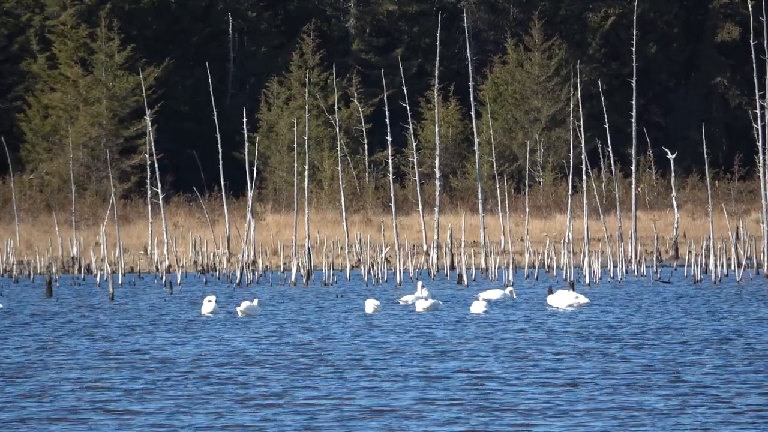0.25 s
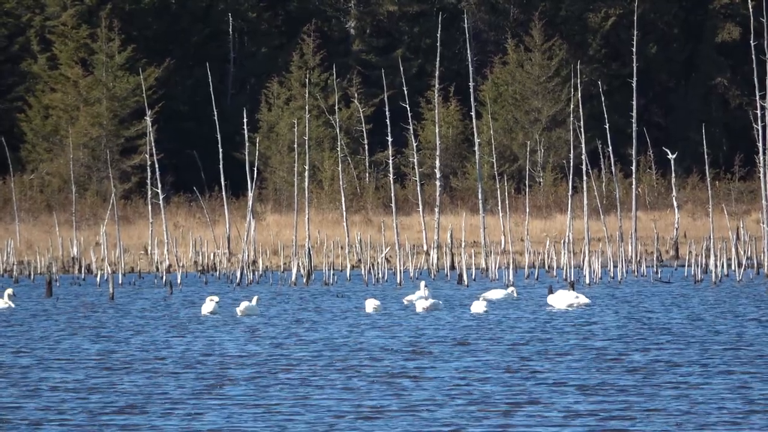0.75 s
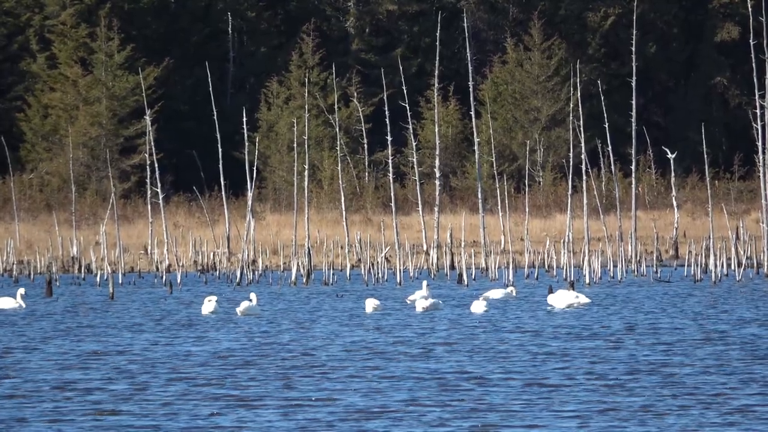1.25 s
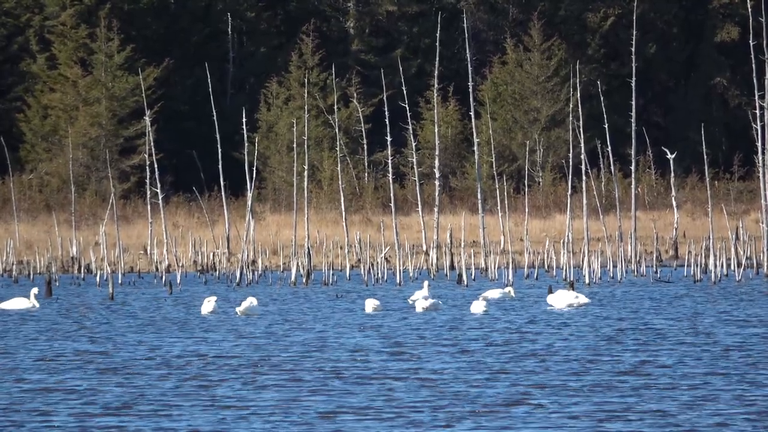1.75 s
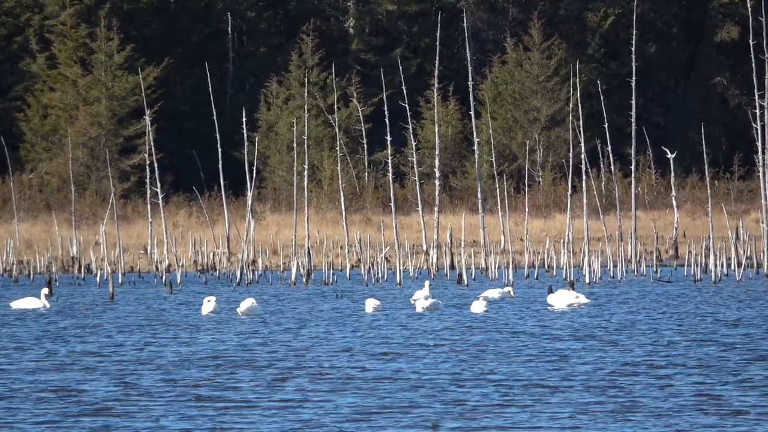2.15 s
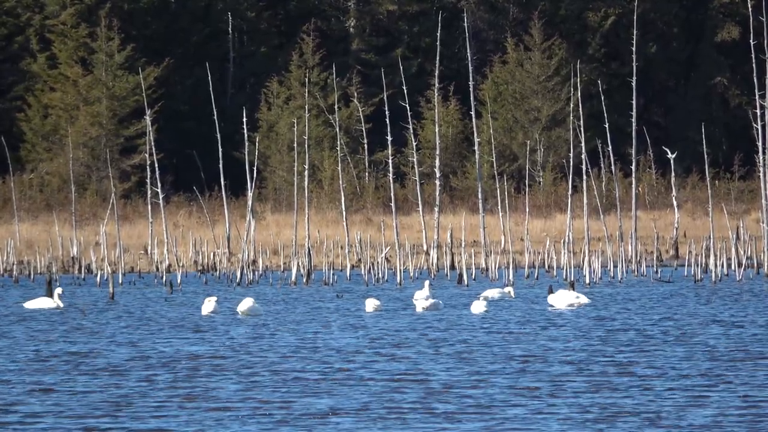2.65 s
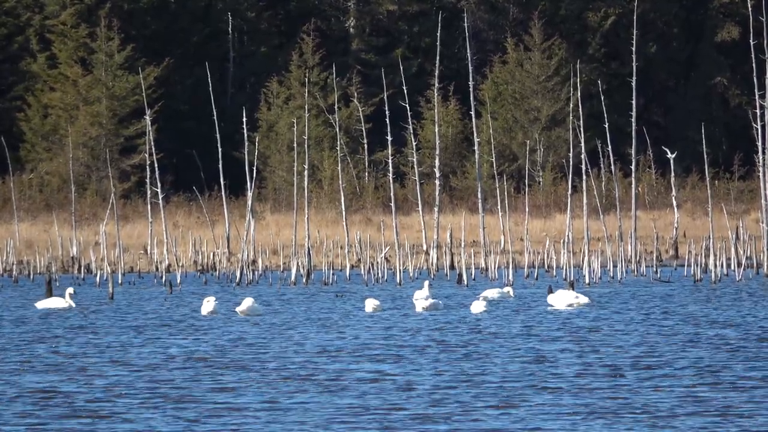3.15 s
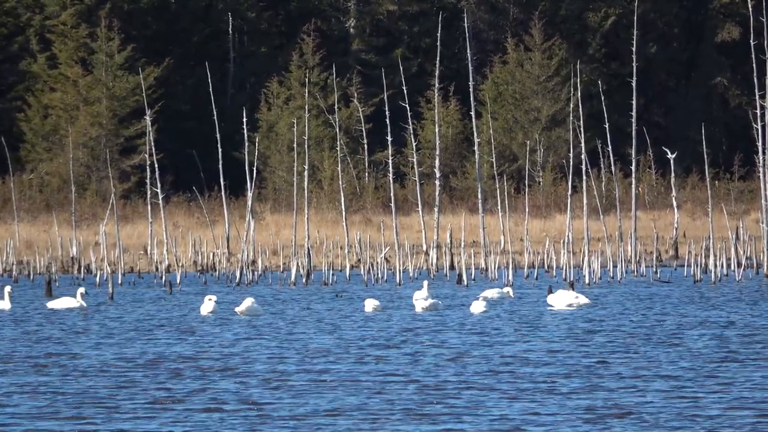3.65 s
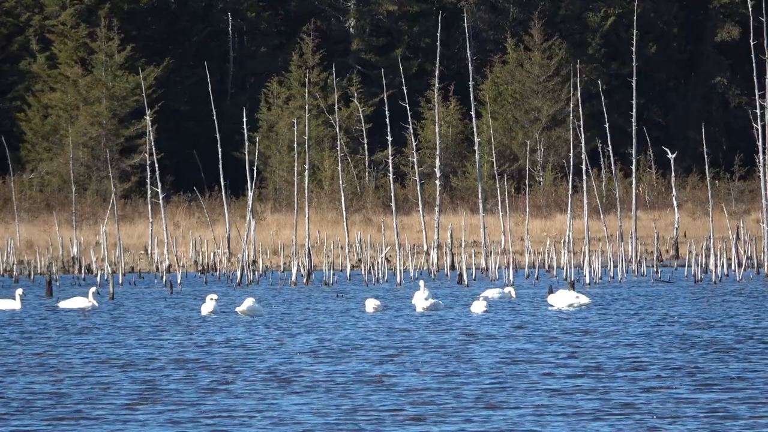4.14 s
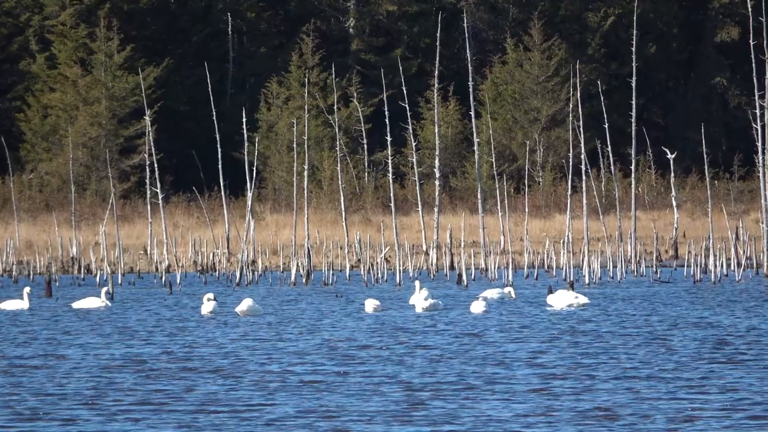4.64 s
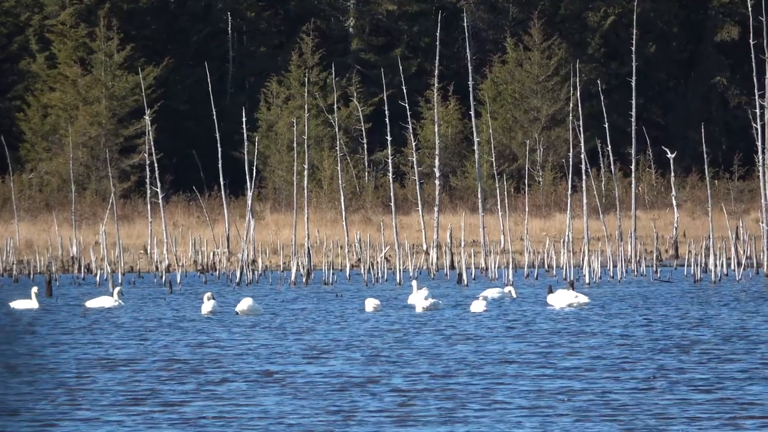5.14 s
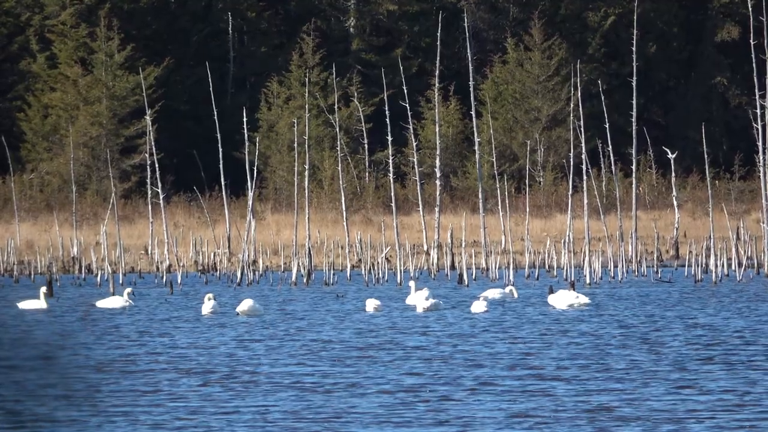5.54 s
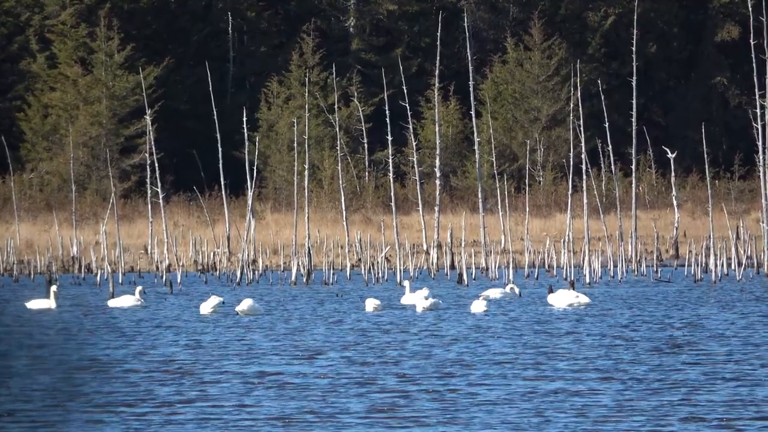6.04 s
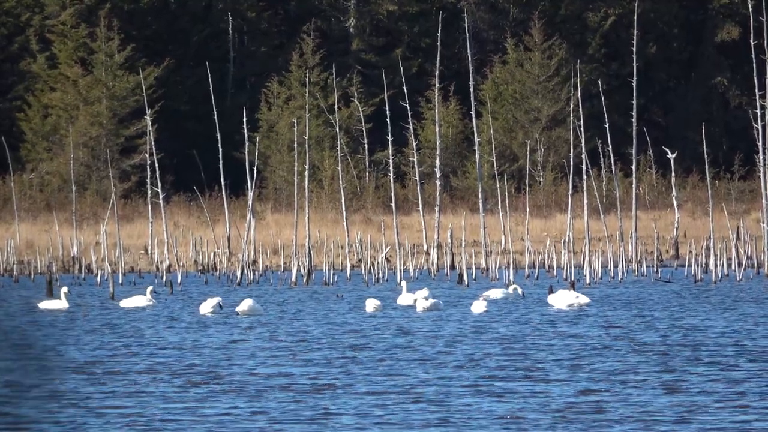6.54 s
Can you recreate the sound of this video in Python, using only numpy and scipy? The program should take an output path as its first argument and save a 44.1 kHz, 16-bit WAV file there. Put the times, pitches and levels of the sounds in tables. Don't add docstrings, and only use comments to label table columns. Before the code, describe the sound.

A distant flock of swans honks in short overlapping calls across a lake while strong wind rumbles and buffets the bare microphone.

```python
import sys
import numpy as np
from scipy import signal
from scipy.fft import rfft, irfft, next_fast_len
from scipy.io import wavfile
from scipy.ndimage import uniform_filter1d

SR = 44100
rng = np.random.default_rng(int(sys.argv[2]) if len(sys.argv) > 2 else 0)


def dump_mix(stems):
    frames = np.atleast_2d(stems).T
    limited = np.clip(frames, -1, 1)
    pcm = np.round(limited * 32767).astype(np.int16)
    wavfile.write(sys.argv[1], SR, pcm)


def volts_from_db(level):
    exponent = np.asarray(level, float) / 20
    return 10 ** exponent


N = 299439

# pitch_hz, level_db (per Hz)
WATER_COLOUR = [(150, -20), (250, 4), (335, -1), (693, -3.5), (1180, -9.5), (2360, -22), (3460, -23),
                (4260, -20), (5520, -28), (7930, -23), (12900, -31.5), (15600, -34)]
# start_s, jump_db, rattle_db
SPRING_FREE = (6.6924, -4, -38)


def size_of(seconds):
    return max(round(seconds * SR), 1)


def evened(x):
    return x / np.sqrt(np.mean(x ** 2) + 1e-20)


def read(points, hz):
    f, value = np.transpose(points)
    return np.interp(np.log(hz + 1), np.log(f + 1), value)


def curves(rows, t):
    s, *columns = np.transpose(rows)
    return [np.interp(t, s, c) for c in columns]


def add(mix, s, sound):
    part = mix[round(s * SR):][:len(sound)]
    part += sound[:len(part)]


def drift(size, span):
    once = uniform_filter1d(rng.standard_normal(size), span)
    return evened(uniform_filter1d(once, span))


def resonate(x, hz, width_hz):
    turn = np.exp(2j * np.pi * hz * np.arange(len(x)) / SR)
    r = np.exp(-np.pi * width_hz / SR)
    once = signal.lfilter([1 - r], [1, -r], x / turn)
    twice = signal.lfilter([1 - r], [1, -r], once)
    return 2 * (turn * twice).real


def band(tone, lo_hz, hi_hz, order=2):
    size = next_fast_len(N)
    hz = np.fft.rfftfreq(size, 1 / SR) + 1e-6
    low_edge = 1 + (lo_hz / hz) ** (2 * order)
    high_edge = 1 + (hz / hi_hz) ** (2 * order)
    spectrum = rfft(rng.standard_normal(size)) * volts_from_db(read(tone, hz)) / np.sqrt(low_edge * high_edge)
    return evened(irfft(spectrum, size)[:N])


def steady(x, seconds, slack):
    return evened(x / np.sqrt(uniform_filter1d(x ** 2, size_of(seconds)) + slack))


def clicks(events, noise, t60_s):
    out, t = np.zeros(N), np.arange(size_of(.03)) / SR
    shape = volts_from_db(-60 * t / t60_s) * np.minimum(t / .0008, 1)
    for s, db in events:
        burst = noise[round(s * SR):][:len(t)] * shape
        add(out, s, volts_from_db(db) * burst / np.linalg.norm(burst) * np.linalg.norm(shape))
    return out


def hump(u, rise, fall, top, curve):
    top = np.clip(top, .1, .9)
    before = rise * abs(1 - u / top) ** curve
    after = fall * abs((u - top) / (1 - top)) ** curve
    return np.where(u < top, before, after)


def honk(rows, voice_db):
    t = np.arange(rows[0][0] - .01, rows[-1][0] + 0.012, 1 / SR)
    hz, db = curves(rows, t)
    longest = size_of(.3)
    wobble = 1 + .005 * drift(longest, size_of(.004))[:len(t)]
    turns = np.cumsum(hz * wobble) / SR + rng.random()
    shares = volts_from_db(np.array([0, *voice_db]))
    note = np.zeros(len(t))
    for k, share in enumerate(shares / np.linalg.norm(shares), 1):
        flicker_db = 1.2 * drift(longest, size_of(.007))[:len(t)]
        note += share * volts_from_db(flicker_db) * np.cos(2 * np.pi * k * turns)
    fades = signal.windows.tukey(len(t), min(0.036 * SR / len(t), 1))
    return t[0], np.sqrt(2) * volts_from_db(db) * note * fades


def shaped(start, length, pitch_hz, level_db, second_db, bend, way):
    third_db, lift, onset_db, ending_db, peak = way
    u = np.linspace(0, 1, 24)
    hz = pitch_hz * (1 - hump(u, *bend, 1.95))
    db = level_db + hump(u, onset_db, ending_db, peak, 2.4)
    fade_db = -34 * max(3 * pitch_hz - 1720, 0) / 1000
    return np.transpose([start + length * u, hz, db]), (second_db, third_db + lift * second_db + fade_db)


def honks():
    # start_s, length_s, pitch_hz, level_db, second_db (second partial over the first)
    low_rising = [
        (1.545, 0.055, 495, -46.5, -16),
        (2.01, 0.072, 464, -50.5, -3),
        (2.425, 0.079, 463, -46, 0),
        (2.87, 0.02, 465, -43.5, -4),
        (3.466, 0.029, 470, -40, -7),
        (3.56, 0.046, 503, -35, 2.5),
        (3.982, 0.0132, 475, -39.5, -12),
        (4.058, 0.031, 497, -41, 2),
        (4.408, 0.056, 488, -39, 0.5),
        (4.83, 0.081, 533, -40, 5),
    ]
    low_falling = [
        (.29, 0.088, 451, -48.5, -7),
        (2.12, 0.068, 440, -48.5, -7),
        (2.503, 0.07, 467, -41.5, -3),
    ]
    low_reedy = [
        (1.078, 0.037, 467, -45, -11),
        (2.66, 0.026, 482, -41.5, -5),
        (2.722, 0.041, 488, -42, 6),
        (3.318, 0.03, 476, -43, 3),
        (5.655, 0.049, 465, -43.5, -5),
    ]
    middle = [
        (.836, 0.03, 610, -49, 13),
        (1.752, 0.061, 565, -38.5, 10.5),
        (2.38, 0.062, 580, -46.5, 22),
        (2.948, 0.039, 621, -43.5, 6),
        (3.39, 0.065, 571, -34, 36),
        (4.478, 0.03, 580, -40.5, 25),
        (4.91, 0.061, 566, -45, 6),
        (5.303, 0.064, 601, -44, 10),
        (5.44, 0.051, 595, -52, 18),
        (5.782, 0.036, 577, -43, 5),
    ]
    high_arched = [
        (.405, 0.086, 742, -39.5, -5.5),
        (.86, 0.097, 796, -49.5, 2),
        (1.588, 0.082, 750, -41, 4),
        (2.676, 0.084, 744, -38, 3.5),
        (3.37, 0.033, 733, -41, -6),
        (3.779, 0.076, 734.4, -36.5, -1.5),
        (4.012, 0.087, 800, -48, -29),
        (4.262, 0.048, 727, -41.5, -15),
        (4.918, 0.042, 755, -38, -3),
    ]
    high_falling = [
        (2.412, 0.04, 751, -39.5, -11),
        (3.584, 0.086, 825, -41, -11),
        (4.082, 0.046, 659, -39, -6.5),
        (4.486, 0.071, 678, -37, 0.5),
        (4.596, 0.0626, 780, -40.5, -11),
        (4.912, 0.048, 671, -38.5, -3.5),
        (5.256, 0.059, 745, -41, 0),
    ]
    # third_db, share of the second partial's lift it takes, onset_db, ending_db, peak place (share of the
    low_rising_way = (-13.5, -0.1, -2.5, -24, 3.3)
    low_falling_way = (-30, -4, -16, -9, 0)
    low_reedy_way = (-2, .2, -10, -11, .45)
    middle_way = (-11, 0.45, -4, -10, 1.1)
    high_arched_way = (-8, 1.2, -5, -10.5, 0.7)
    high_falling_way = (-19, 1.5, -8, -2.5, -0.5)
    # time_s, pitch_hz, level_db
    long_call = [
        (6.56, 455.6, -43),
        (6.6, 463, -43),
        (6.67, 471, -41.5),
        (6.7, 473.5, -49),
        (6.79, 479, -38.5),
    ]
    kinds = [(low_rising, (.065, .005, .85), low_rising_way),
             (low_falling, (.01, .09, .2), low_falling_way),
             (low_reedy, (.012, .01, .5), low_reedy_way),
             (middle, (.035, .03, .6), middle_way),
             (high_arched, (.062, .065, .62), high_arched_way),
             (high_falling, (.025, .095, .3), high_falling_way)]
    out = np.zeros(N)
    for calls, bend, way in kinds:
        for row in calls:
            add(out, *honk(*shaped(*row, bend, way)))
    add(out, *honk(long_call, (6, 4.5)))
    return out


def pulses(hz, rough):
    # pitch_hz, width_hz, level_db
    windpipe = [(740, 180, 3.5), (1117, 340, 4.5), (1340, 110, -4)]
    turns = np.cumsum(hz * (1 + 0.134 * rough * drift(len(hz), size_of(0.0032)))) / SR
    folds = sum(np.cos(2 * np.pi * k * turns) for k in range(2, 10))
    puffs = (0.15 + np.exp(-(turns % 1) / 0.65)) * rng.standard_normal(len(hz))
    drive = (1 - rough) * evened(folds) + rough * 2.5 * evened(puffs)
    pipe = sum(volts_from_db(g) * resonate(drive, f, w) for f, w, g in windpipe)
    return evened(signal.sosfilt(signal.butter(6, 1520, fs=SR, output="sos"), pipe))


def grunt(s, length, rate_hz, db, rough, glide_per_s):
    size, longest = size_of(length + .015), size_of(.2)
    hz = rate_hz * (1 + glide_per_s * (np.arange(longest) - size / 2) / SR)
    return s - .008, volts_from_db(db + 6.0) * pulses(hz, rough)[:size] * np.hanning(size)


def purr():
    # time_s, pulse_rate_hz, level_db
    purr_path = [
        (3.19, 160, -53),
        (3.24, 162, -50),
        (3.29, 167, -48),
        (3.33, 177, -45),
        (3.36, 183, -48),
    ]
    t = np.arange(purr_path[0][0], purr_path[-1][0], 1 / SR)
    hz, db = curves(purr_path, t)
    ringing = evened(resonate(pulses(hz, .01), 1420, 450))
    return t[0], volts_from_db(db) * ringing * signal.windows.tukey(len(t), .2)


def grunts():
    # start_s, length_s, pulse_rate_hz, level_db, roughness (0-1)
    climbing = [(1.565, 0.049, 202, -54, 0.68), (1.721, 0.054, 182, -47.5, 0.42),
                (1.798, 0.037, 183, -56, 0.3), (2.867, 0.048, 201.5, -54, 0.7),
                (2.929, 0.047, 202.3, -49, 0.7), (3.355, 0.031, 176, -46, 0.48),
                (3.448, 0.052, 186, -64, 0.8), (3.575, 0.078, 196, -51, 0.52),
                (3.975, 0.14, 193.2, -51, 0.45), (5.222, 0.029, 181.2, -50.5, 0.37),
                (5.64, 0.027, 189.7, -51, 0.46)]
    sinking = [
        (0.388, 0.029, 204, -49, 0.8),
        (2.648, 0.035, 204, -45, 0.48),
        (4.375, 0.04, 186, -45.5, 0.35),
        (4.438, 0.05, 186.5, -50, 0.5),
        (4.803, 0.085, 178.7, -45.5, 0.35),
    ]
    out = np.zeros(N)
    for row in climbing:
        add(out, *grunt(*row, 0.696))
    for row in sinking:
        add(out, *grunt(*row, -1.94))
    add(out, *purr())
    return out


def shore(x):
    # pitch_hz, t60_s
    shore_ring = [(400, .5), (1500, .6), (3000, .3)]
    hz, t, z = signal.stft(rng.standard_normal(SR), SR, nperseg=512)
    decay = volts_from_db(-60 * t / read(shore_ring, hz)[:, None])
    tail = signal.istft(z * decay * np.minimum(t / 0.048, 1), SR, nperseg=512)[1]
    return signal.fftconvolve(x, tail / np.linalg.norm(tail))[:N]


def swans():
    flock = honks() + grunts()
    return flock + volts_from_db(-20.0) * shore(flock)


def strays():
    # start_s, length_s, from_hz,
    # to_hz, level_db
    lone_partials = [(0.563, 0.041, 1472, 1450, -52), (.66, 0.043, 1486, 1500, -61), (1.065, .02, 670, 690, -48),
                     (1.81, 0.038, 1310, 1110, -48), (2.487, 0.027, 1257, 1070, -44),
                     (2.801, .035, 1430, 1400, -51), (2.852, .022, 1464, 1480, -56),
                     (2.901, 0.069, 462, 470, -50), (3.462, 0.014, 1600, 1480, -48), (3.603, .04, 726, 610, -44),
                     (3.728, 0.038, 730, 750, -41), (2.356, 0.031, 1095, 1160, -39),
                     (2.35, 0.04, 1640, 1740, -55), (3.896, 0.023, 1417, 1450, -58),
                     (3.956, 0.018, 1457, 1400, -51), (3.988, 0.028, 995, 1196, -43),
                     (4.024, .04, 1120, 1070, -51), (4.406, 0.035, 1350, 1400, -51),
                     (4.677, 0.032, 1570, 1460, -52), (4.765, 0.046, 1000, 1400, -63),
                     (4.831, 0.048, 1550, 1580, -48), (4.91, 0.091, 1580, 1680, -52),
                     (4.993, 0.02, 756, 650, -51), (5.0, 0.051, 1340, 1340, -52.5),
                     (5.782, .018, 1380, 1350, -46), (6.513, .03, 1170, 1220, -54),
                     (5.234, 0.028, 1590, 1300, -43), (5.381, 0.02, 814, 690, -41), (.5, 0.033, 1446, 1510, -49),
                     (3.367, 0.031, 1210, 1280, -42), (3.37, .03, 830, 910, -43), (4.799, 0.055, 1340, 1234, -43),
                     (4.837, .025, 555, 440, -38.5), (3.55, 0.056, 1250, 1187, -43.5),
                     (3.585, .012, 1376, 1380, -46),
                     (.69, 0.039, 1484, 1460, -60), (1.578, .02, 1278, 1240, -39.5),
                   (1.814, 0.033, 1254, 1180, -54), (2.655, 0.026, 1290, 1200, -41),
                   (3.55, 0.045, 673, 660, -45), (3.77, 0.018, 1255, 1170, -45),
                   (3.81, 0.068, 1260, 1220, -50), (3.997, 0.027, 690, 760, -44),
                   (4.098, 0.065, 1283, 1252, -51), (4.37, 0.025, 795, 720, -46),
                   (4.392, .035, 1150, 1050, -45), (4.449, .035, 1148, 1025, -41),
                   (4.82, 0.1, 1155, 1240, -46), (4.927, 0.04, 1326, 1190, -48),
                   (5.224, .03, 1064, 1114, -42)]
    out = np.zeros(N)
    for s, length, from_hz, to_hz, db in lone_partials:
        rows = [(s, from_hz, db - 10),
                (s + length / 2, (from_hz + to_hz) / 2, db),
                (s + length, to_hz, db - 10)]
        add(out, *honk(rows, ()))
    return out


def reeds(x):
    t60_s = .16
    t = np.arange(size_of(t60_s)) / SR
    tail = rng.standard_normal(len(t)) * volts_from_db(-60 * t / t60_s) * np.minimum(t / .006, 1)
    return x + volts_from_db(-12) * signal.fftconvolve(x, tail / np.linalg.norm(tail))[:N]


def murmur(t, count=1300):
    # time_s, level_db
    murmur_level = [(0, -63), (.6, -59), (1.3, -58.5), (1.7, -53), (2.1, -57), (2.6, -51.5), (3.1, -60),
                    (3.5, -56), (3.72, -45.5), (3.9, -54), (4.15, -59), (4.45, -49), (4.85, -58),
                    (5.05, -57), (5.3, -54), (5.7, -54.5), (6.1, -62), (6.5, -55), (6.79, -55)]
    lo_hz, hi_hz, note_s = 700, 1490, .04
    out, u = np.zeros(N), np.linspace(-1, 1, size_of(note_s))
    for when, pitch, bend, size in rng.random((count, 4)):
        glide = 1 + .08 * ((2 * bend - 1) * u - .5 * u ** 2)
        hz = (lo_hz + pitch * (hi_hz - lo_hz)) * glide
        note = np.hanning(len(u)) * np.sin(2 * np.pi * np.cumsum(hz) / SR)
        add(out, when * t[-1], volts_from_db(4.5 * size) * note)
    return volts_from_db(curves(murmur_level, t)[0]) * evened(out)


def wind(t):
    # time_s, level_db
    wind_strength = [(0, -8), (.2, -13), (.4, -8.5), (.9, -9.5), (1.2, -12.5), (1.6, -13.5), (2.15, -18.5),
                     (2.9, -12), (3.3, -15.5), (3.75, -8.5), (4.0, -14), (4.5, -11), (5.2, -11), (5.45, -6),
                     (5.9, -14), (6.1, -7.5), (6.5, -8.5), (6.79, -1)]
    # pitch_hz, level_db (per Hz)
    wind_colour = [(2.4, -81), (4.0, 4.5), (16, 6.5), (30, 5), (41, -9.5), (178, -31), (400, -49),
                   (520, -53), (880, -120)]
    # middle_s, length_s, flutter_lift_db, edge_lift_db
    eddies = [(0.484, 0.57, 1, 2.5), (0.723, 0.47, 4.5, 3.5), (0.927, 0.13, 10, 3.5), (1.2, 0.23, 5, 5.5),
              (1.711, 0.086, 16, 6), (2.072, 0.16, 3.5, 3), (2.54, 0.18, 3.5, -2.5), (2.94, 0.16, 1, -2),
              (3.212, 0.11, 9.5, 0), (3.68, 0.17, 5, -1.5), (4.082, 0.23, 9.5, 3), (4.526, 0.32, 3.5, 3.5),
              (5.197, 0.15, 6, -2), (5.404, 0.16, 6.5, 18), (5.554, 0.15, 2.5, 3.5),
              (5.647, 0.27, 7.5, 9.5), (5.835, 0.13, 9.5, -7), (6.098, 0.13, 9, 18),
              (6.171, 0.14, 11, 14.5), (6.376, 0.055, 7, 14), (6.53, 0.12, 6, -3), (6.648, 0.18, 10, 12)]
    deep_db, = curves(wind_strength, t)
    lifts_db = np.zeros((N, 2))
    for s, length, *lift_db in eddies:
        swell = signal.windows.tukey(size_of(length), 0.91)
        add(lifts_db, s - length / 2, np.outer(swell, lift_db))
    over_mean_db = deep_db + 13
    flutter_db = -28.5 + 0.79 * over_mean_db + lifts_db[:, 0] + 2.0 * drift(N, size_of(0.0108))
    edge_db = -44 + 0.58 * over_mean_db + lifts_db[:, 1] + 1.33 * drift(N, size_of(0.0032))
    deep = volts_from_db(deep_db) * steady(band(wind_colour, 1.3, 61.6, order=4), 0.12, 0.2)
    flutter = volts_from_db(flutter_db) * steady(band(wind_colour, 43.7, 109.3, order=4), 0.056, 0.98)
    edge = volts_from_db(edge_db) * steady(band(wind_colour, 105.3, 414, order=4), 0.049, 0.16)
    under_way = np.clip(t / .012, 0, 1)
    push = (deep + flutter) * under_way + volts_from_db(-3.5) * (1 - under_way)
    return push / (1 + push ** 8) ** (1 / 8), edge


def pinned():
    # start_s, length_s, level_db (change)
    deaf_spells = [
        (5.389, 0.0021, -18),
        (5.426, 0.0065, -34),
        (5.586, 0.002, -20),
        (6.118, 0.0032, -25),
        (6.265, 0.0048, -11),
        (6.371, 0.0065, -32),
        (6.375, 0.028, -3.5),
        (6.672, 0.03, -38),
        (6.747, 0.0061, -17),
    ]
    deaf_db = np.zeros(N)
    for s, length, db in deaf_spells:
        add(deaf_db, s, np.full(size_of(length), 1. * db))
    return deaf_db


def snap():
    s, jump_db, rattle_db = SPRING_FREE
    out = clicks([(s, rattle_db)], band(WATER_COLOUR, 2500, 9000), .015)
    u = np.arange(size_of(.08)) / SR
    jump = np.sin(np.pi / 2 * np.minimum(u / .0014, 1)) * np.exp(-u / .009)
    add(out, s, volts_from_db(jump_db) * jump)
    return out


def creaks():
    # start_s, length_s, slips_hz, level_db (peak)
    slipping = [(5.1, .005, 640, -37), (5.14, .0065, 780, -34), (5.167, .005, 650, -41),
                (5.372, .007, 800, -38), (5.508, .006, 850, -38), (5.553, .007, 520, -37),
                (5.601, .006, 500, -37), (5.656, .006, 550, -37), (6.056, .005, 600, -41),
                (6.2345, .0075, 1280, -36), (6.2345, .007, 1950, -36), (6.3015, .006, 430, -35),
                (6.3515, .005, 540, -38), (6.4635, .007, 360, -33), (6.59, .007, 600, -37)]
    out = np.zeros(N)
    for s, length, rate_hz, db in slipping:
        size = size_of(length)
        turns = np.cumsum(rate_hz * (1 + .12 * drift(size, size_of(.0008)))) / SR
        slips = sum(np.sin(2 * np.pi * k * turns) / k for k in range(1, 5))
        add(out, s, volts_from_db(db - 3.5) * slips * signal.windows.tukey(size, .25))
    return signal.sosfilt(signal.butter(4, 1700, fs=SR, output="sos"), out)


def water(t):
    # time_s, near_ripples_db, far_wash_db
    water_level = [(0.0, -55, -45.5), (1.64, -58, -46), (2.7, -56, -45.5), (3.2, -57.5, -45),
                   (3.5, -55.5, -41.5), (4.01, -56.5, -46.5), (4.63, -53.5, -45), (4.8, -52.5, -44.5),
                   (5.12, -56, -46.5), (5.6, -53.5, -45), (6.0, -56, -47), (6.47, -55, -46.5),
                   (6.79, -57.5, -42.5)]
    near_db, far_db = curves(water_level, t)
    flicker_db = 1.1 * drift(N, size_of(.022)) + 1.1 * drift(N, size_of(.003))
    swell = drift(N, size_of(0.12))
    far = volts_from_db(far_db + 2.05 * swell - 2.5) * band(WATER_COLOUR, 320, 2310, order=4)
    near = volts_from_db(near_db + flicker_db + 0.27 * swell - 0.13) * band(WATER_COLOUR, 2010, 23000, order=4)
    return far + near


def droplets():
    # start_s, level_db (peak)
    drops = [(1.1992, -33), (2.3526, -50), (2.7537, -32), (2.9737, -53), (3.4152, -47), (3.5304, -50),
             (.8006, -54), (2.624, -54), (6.478, -43), (4.0123, -30), (4.389, -44), (4.4244, -44),
             (5.6304, -27), (6.404, -30)]
    return clicks(drops, band(WATER_COLOUR, 4000, 15900), 0.0026)


def scene():
    t = np.arange(N) / SR
    air = reeds(swans() + strays()) + murmur(t) + water(t) + droplets()
    rumble, edge = wind(t)
    deaf_db = pinned()
    heard = air * volts_from_db(uniform_filter1d(deaf_db, size_of(0.00079)))
    heard += edge * uniform_filter1d(volts_from_db(deaf_db), size_of(.005))
    sag = volts_from_db(-14 * np.exp(-((t - SPRING_FREE[0]) / .012) ** 2))
    fade_out = np.sin(np.pi / 2 * np.clip((t[-1] - t) / .012, 0, 1))
    return (heard + rumble * sag * fade_out + snap() + creaks())[None]


def low_pass(x):
    return signal.sosfilt(signal.butter(12, 15710, fs=SR, output="sos"), x)


def record(dry):
    mix = np.clip(dry, -.992, .992)
    return low_pass(mix)


dry = scene()
out = record(dry)
dump_mix(out)
```